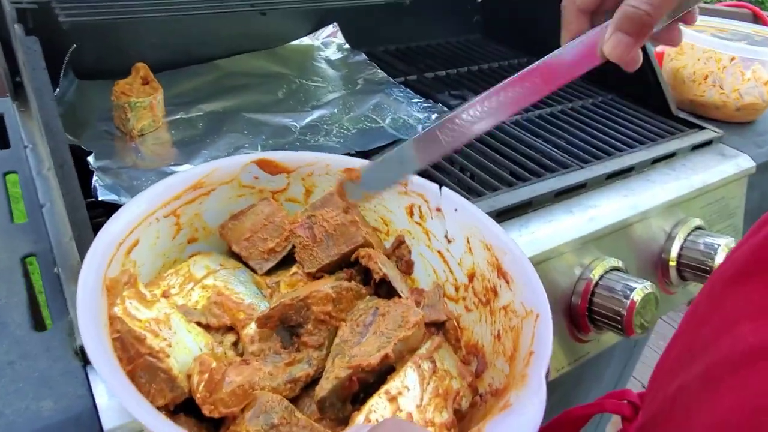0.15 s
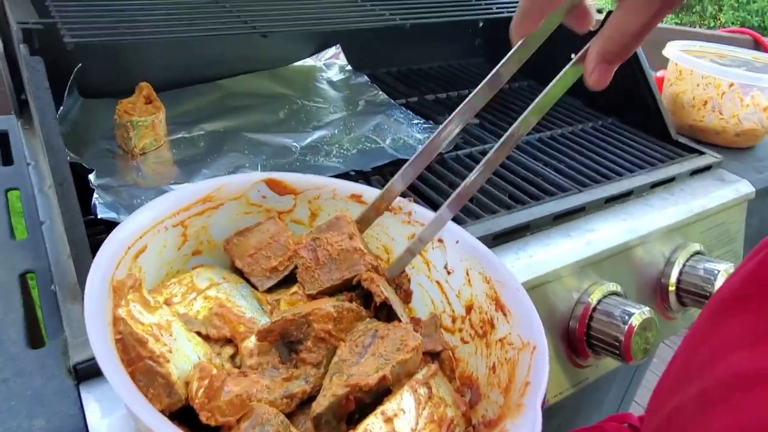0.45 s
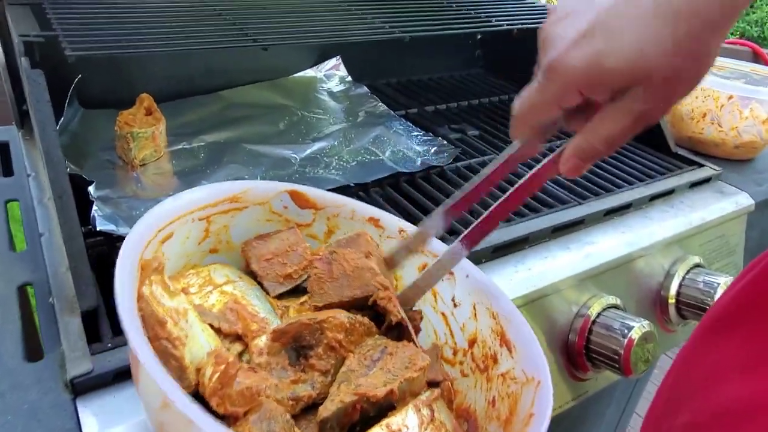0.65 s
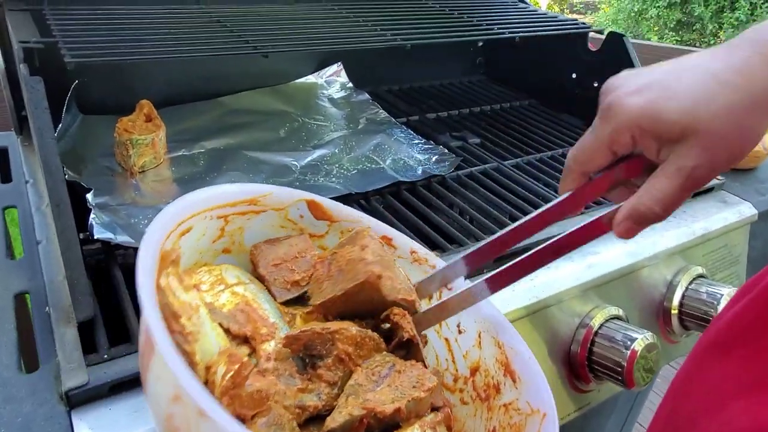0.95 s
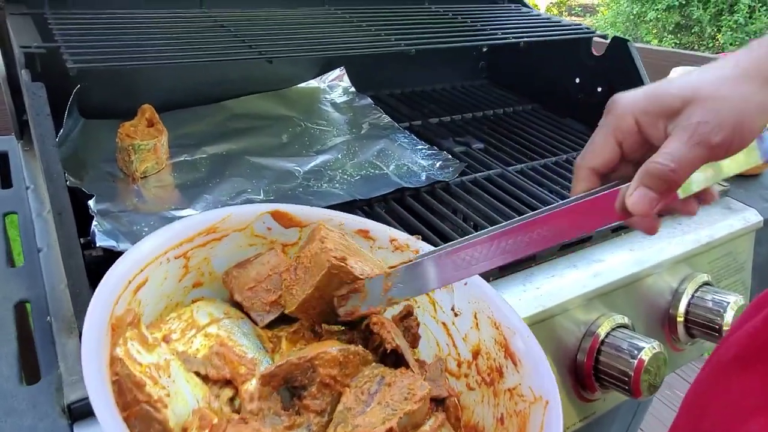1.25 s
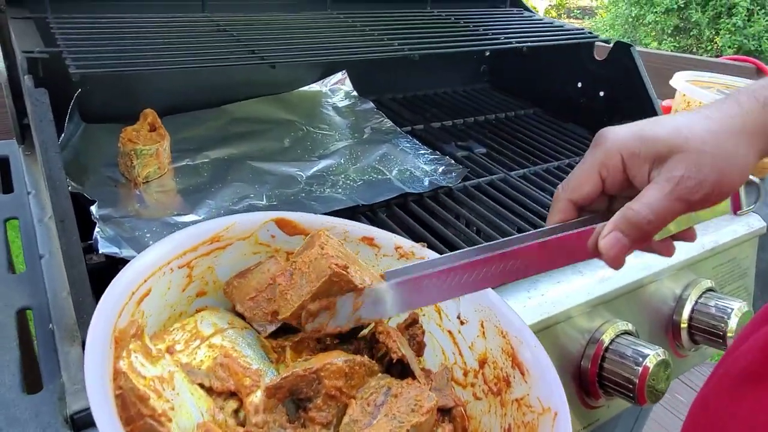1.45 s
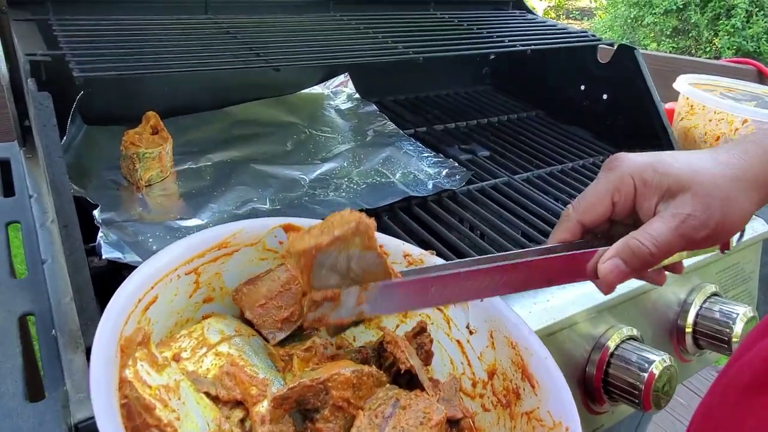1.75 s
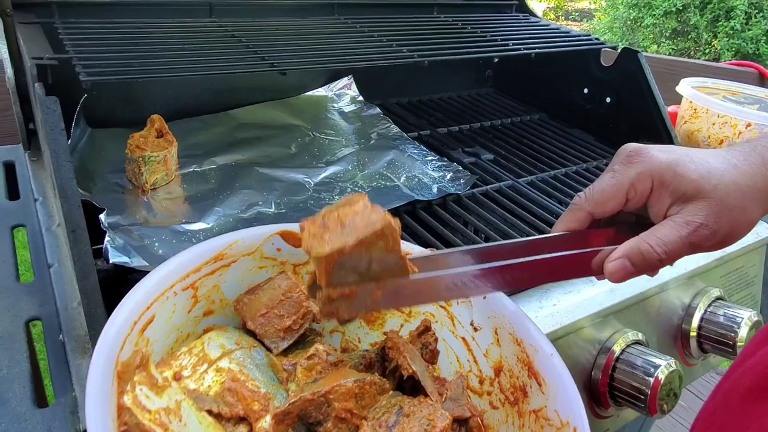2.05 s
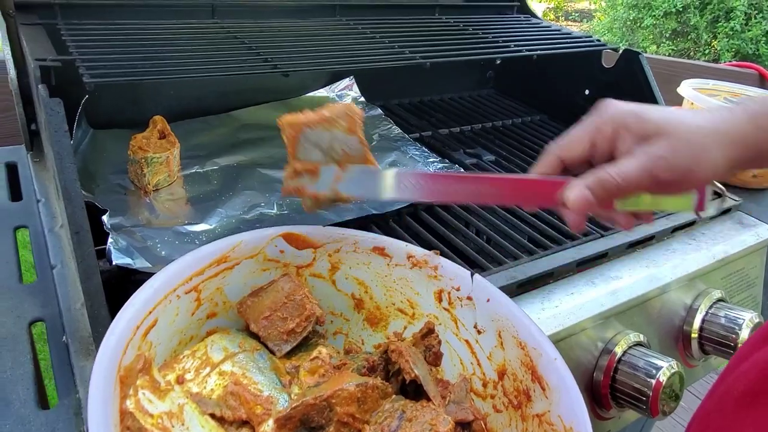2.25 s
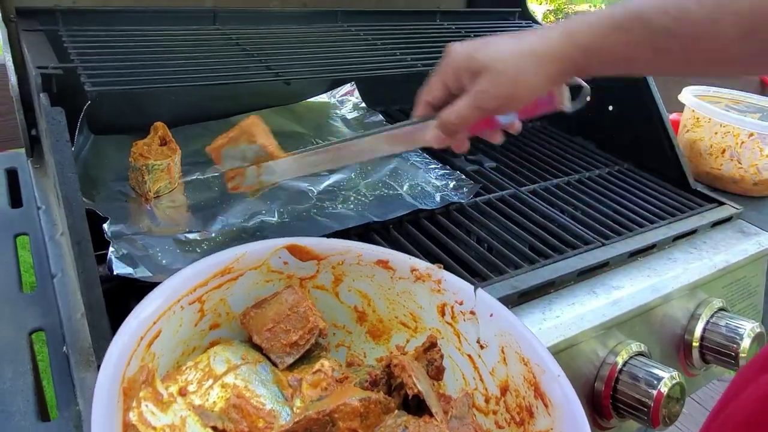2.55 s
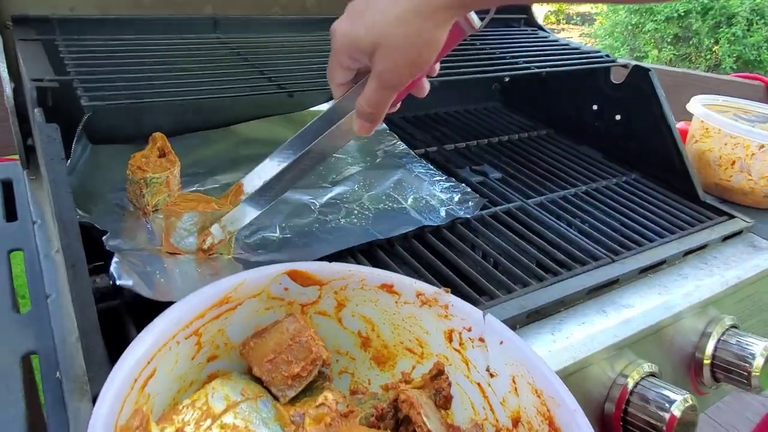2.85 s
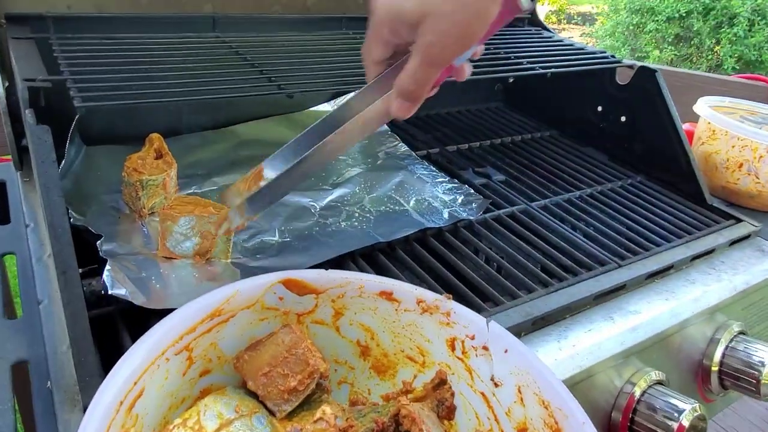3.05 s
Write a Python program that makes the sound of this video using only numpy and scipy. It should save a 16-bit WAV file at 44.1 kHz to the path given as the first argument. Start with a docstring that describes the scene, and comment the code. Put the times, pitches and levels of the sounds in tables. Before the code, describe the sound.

Steel tongs clack hard on a plastic bowl at the very start, followed by smaller, fainter taps; outdoors, close microphone, low rumble and faint grill sizzle beneath, ending with a soft thump and brief hiss on foil.

```python
"""Sharp taps of steel tongs on a plastic bowl of marinated food, held close to the microphone outdoors.
Each tap is a sum of decaying modes with a noise crack; filtered noise gives the tips' rub and the bowl's thud.
Beside it, food on the foil of a lit gas grill sizzles and spits: short noise bursts coloured by the foil.
Late on, a new piece lands with a noise thump and a short hiss that flares twice.
Burner and distant traffic rumble underneath, as noise shaped separately for centre and sides."""
import sys
import numpy as np
from scipy import signal
from scipy.fft import rfft, irfft
from scipy.io import wavfile
from scipy.ndimage import uniform_filter1d

SR = 44100
rng = np.random.default_rng(int(sys.argv[2]) if len(sys.argv) > 2 else 0)


def dump_mix(stems):
    """Bounce the given channels to the path in sys.argv[1] as a 16-bit WAV at rate SR."""
    frames = np.atleast_2d(stems).T  # one column per channel
    limited = np.clip(frames, -1, 1)  # hard clip at full scale
    pcm = np.round(limited * 32767).astype(np.int16)
    wavfile.write(sys.argv[1], SR, pcm)


N = 141120  # samples, 3.2 s

# Touches of the tongs on the bowl: (time [s], ring peak before panning [dB], best excited pitch [Hz],
# reach around it [octaves], left minus right [dB], extra weight of the low body modes [dB],
# pitch factor of the upper modes from the grip [ratio], pitch silenced by touching its node [Hz])
TAPS = [(.0055, -35, 1700, 0.2, 0, 0, 1, 1234), (.012, -39, 2000, 0.41, -4, 12, 1.1, 1300),
        (0.0655, 4, 1430, 1.28, 1.5, -6.5, 1.016, 1730), (0.0814, -29, 1200, 0.2, -5, 0, 0.98, 1512),
        (0.1339, -8, 1460, 0.98, 0, -4.5, 1.04, 1490), (.157, -32, 1500, 1.7, -11, 5, 1, 2300),
        (0.169, -39, 1770, 0.15, 3, 0, 1.1, 1260), (0.1834, -19, 1790, 0.1, 0, -2, 1.03, 1290),
        (0.2947, -24, 1340, 1, -0.5, 14, 1.01, 1580), (0.3165, -31.5, 1610, 0.7, -3, 3, 0.97, 1550),
        (0.4646, -19, 1850, 0.4, -2, 25.5, 1.004, 1530), (0.6715, -29.5, 1750, 0.12, -6, 31, 0.97, 1280),
        (.806, -38, 2020, .3, -2, 5, 0.91, 1234), (0.8162, -17.5, 1800, 0.86, 1.5, 15, .985, 1190),
        (0.8401, -33.5, 2980, 0.92, -6, -8, 0.98, 1300), (1.245, -41, 1750, 0.11, -8, -0.5, 1.3, 1300),
        (1.2531, -29, 1840, 0.089, -4, 40, 1.2, 1300), (1.259, -32, 1900, 0.38, -5, 22, 1.44, 1300),
        (1.333, -30.5, 1350, 1.5, -2, 5, 0.98, 1450), (1.422, -40.5, 1500, 1.6, -11, -2, 0.81, 2000)]
# Modes of bowl and tong tips: (pitch [Hz], relative level [dB], 60 dB decay [s], left minus right [dB])
MODES = [(300.7, -3, 0.067, 0.5), (498, -12, 0.0261, -2.5), (712, -14, 0.036, -9), (1073, -14, 0.046, 1.5),
         (1232, 2.5, 0.023, 0), (1499, -4, 0.021, 5), (1692, -12, 0.028, -3.5), (1955, -7.5, 0.019, -2),
         (2380, -15, 0.016, -1), (2600, -14, 0.025, 2.5), (3130, -3, .014, 3.5), (3290, -3, 0.014, -5),
         (3700, -15, 0.021, -3.5), (3820, -16.5, 0.032, 9.5), (6500, -14.5, 0.022, -13.5),
         (7040, -18, 0.015, 11.5)]
# Tong tips rubbing through the food: (time [s], level before panning [dB])
RUB = [(0, -32), (.02, -43), (.03, -91), (.09, -40), (.125, -76), (.15, -47), (.2, -48), (.23, -86),
       (.36, -64), (.48, -61.5), (.6, -73), (.7, -54), (.77, -64), (.805, -59), (.86, -77.5), (1.2, -64.5),
       (1.38, -63), (1.55, -64), (1.6, -74)]
# Bowl shifting in the hand: (time [s], level before panning [dB])
BOWL_SHIFT = [(0, -65), (.018, -38.5), (.05, -49.5), (.085, -42), (.12, -49.5), (.21, -51), (.26, -58),
              (.33, -51), (.37, -56.5), (.42, -62)]
# Spits of fat on the foil: (time [s], relative level [dB], centre pitch [Hz])
SPITS = [(0.103, -37.5, 12300), (0.198, -40.5, 14400), (0.2453, -45.5, 13000), (0.3292, -44, 14000),
         (0.3685, -41.5, 14200), (0.5761, -40, 8500), (0.601, -44, 13800), (0.6774, -44.5, 14500),
         (1.0733, -38.5, 13000), (1.0992, -48, 14400), (1.1416, -43.5, 13700), (1.286, -45.5, 14000),
         (1.4197, -41, 14200), (1.732, -31.5, 14500), (2.3103, -47.5, 8380), (2.3273, -47, 8960),
         (2.353, -43.5, 12000), (2.451, -38, 11500), (2.5661, -50, 13900), (2.638, -46.5, 13500),
         (2.663, -47.5, 13370), (2.798, -36, 13240)]
# Ring of the foil: (frequency [Hz], gain [dB])
FOIL = [(1000, -41.5), (3000, 0.5), (4500, 5), (5500, 1.5), (8500, 6.5), (10000, 4.5), (11800, 7),
        (12700, 8.5), (13800, 7), (15500, -1.5)]
# Food landing on hot foil: (time [s], relative level [dB], brightness: treble up and bass down [dB])
HISS = [(2.871, -50, 8), (2.874, -41, 7), (2.877, -34, 10), (2.883, -24, 5.5), (2.889, -29, 4),
        (2.894, -28.5, -1.5), (2.900, -24, 0.5), (2.908, -26.5, 3), (2.918, -32, 0.5), (2.925, -33, -1),
        (2.939, -39.5, -2.5), (2.95, -46, -5), (2.975, -66, -8)]
# Colour of that hiss: (frequency [Hz], relative density [dB per Hz])
HISS_COLOUR = [(180, -18), (300, -4.5), (990, -6), (1270, -14), (3490, -3.5), (6670, -8.5), (10500, -4.5),
               (13800, -5), (14800, -11), (15800, -56)]
# Background, centre of the image: (frequency [Hz], relative density [dB per Hz])
AIR_CENTRE = [(15, -61), (25, -33.5), (48, -2), (66, -3), (78, -3.5), (88, 3), (99, -3), (116, 1),
              (140, -10.5), (215, -11.5), (297, -13.5), (359, -12.5), (930, -27), (1170, -32.5),
              (3090, -35), (3530, -32.5), (12200, -31.5), (14300, -27), (15500, -54)]
# Background, sides of the image: (frequency [Hz], relative density [dB per Hz])
AIR_SIDES = [(15, -16), (25, -2), (55, -5.5), (267, -16), (399, -12), (495, -13), (895, -9), (2170, -23.5),
             (13200, -19), (14300, -15), (15500, -40)]
# Steady sizzle, read relative to SIZZLE_REF_DB: (time [s], level [dB])
SIZZLE = [(0.0, -48), (0.22, -59), (0.37, -54.5), (0.52, -59), (1.08, -59.5), (1.27, -57.5), (1.58, -56.5),
          (2.17, -60), (2.8, -56.5), (2.93, -63), (3.2, -58)]

# Taps
ONSET_S, SWELL_S, BODY_BELOW_HZ = .0008, 0.00077, 800
DISPERSION = 0.24  # exponent: higher modes crest earlier
NODE_OCTAVES = .12  # width of the gap that a node leaves
SCATTER_DB, DETUNE = 1.5, .006  # random spread of mode levels, and of pitches as a ratio
RIGHT_LATE_S = .00011
CRACK_DB, CRACK_T60_S, CRACK_HZ = -22.5, 0.026, 6350
YARD_DB, YARD_T60_S = -20, .09
# Rub and bowl thud
RUB_HZ, RUB_OCTAVES, RUB_GRAIN_DB = 1720, .17, 4
THUD_HZ = 215
# Spits and fizz; levels before the foil's ring
SPIT_TRIM_DB, SPIT_T60_S, POP_S, POP_DB = -4.5, .045, 0.003, -3
FIZZ_PER_S, FIZZ_SPREAD_DB, FIZZ_DB = 580, 11, -64
FOIL_PAN_DB = -4.5  # left minus right
# Landing
HISS_GRAIN_DB, CRACKLE_DB = 1.2, 1.4
HISS_LOW_HZ, HISS_HIGH_HZ = 3000, 7500  # edges of the bass and treble bands
HISS_WIDTH, HISS_PAN_DB = 0.96, -2
THUMP_S, THUMP_HZ, THUMP_T60_S = 2.872, 199, 0.26
THUMP_DB = -41.5  # before the decay
# Background; levels before panning and sizzle swells
AIR_CENTRE_DB, AIR_SIDES_DB = -48, -55
SIZZLE_FROM_HZ, SIZZLE_REF_DB = 3000, -57.5
# Microphone side
QUIET_TOP_HZ = 14600  # treble limit of everything but the taps
TOP_HZ, CEILING = 15900, 1.12


def undb(db):
    """Decibels to amplitude ratio."""
    return 10 ** (np.asarray(db, float) / 20)


def level(x, db):
    """Scales to an RMS level in dB."""
    return x * undb(db) / np.sqrt(np.mean(x ** 2))


def curve(table, column=1):
    """One column of a timed table, joined by straight lines."""
    return np.interp(np.arange(N) / SR, *np.array(table).T[[0, column]])


def colour(x, table):
    """Filters to a spectrum of (frequency [Hz], gain [dB]) points."""
    hz, db = np.array(table).T
    f = np.arange(len(x) // 2 + 1) * SR / len(x) + 1
    return irfft(rfft(x) * undb(np.interp(np.log(f), np.log(hz), db)), len(x))


def walk(rate):
    """Random values held 1 / rate seconds, then smoothed; spread near 1."""
    k = int(SR / rate)
    held = np.repeat(rng.standard_normal(N // k + 1), k)
    return np.sqrt(2) * uniform_filter1d(uniform_filter1d(held, k), k)[:N]


def pan(x, db):
    """Sets left against right by db, half on each channel."""
    return x * undb(np.array([[db], [-db]]) / 2)


def add(out, s, x):
    """Mixes x into out from time s."""
    i = int(s * SR)
    out[:, i:i + x.shape[1]] += x[:, :N - i]


def band(x, hz, octaves):
    """Gentle band-pass reaching the given octaves to each side."""
    edges = np.clip([hz / 2 ** octaves, hz * 2 ** octaves], 20, .49 * SR)
    return signal.sosfilt(signal.butter(1, edges, "band", fs=SR, output="sos"), x)


def split(x, hz, kind="low"):
    """Zero-phase low-pass or high-pass."""
    return signal.sosfiltfilt(signal.butter(2, hz, kind, fs=SR, output="sos"), x)


def tong_taps():
    """Each touch rings modes near its pitch, spares one at its node and adds a thin crack of noise."""
    out = np.zeros((2, N))
    # the sound reaches the left channel first
    t = (np.arange(SR // 8) / SR - np.array([[0], [RIGHT_LATE_S]])).clip(0)
    hz, db, t60, side_db = np.array(MODES).T[:, :, None, None]
    is_body = hz < BODY_BELOW_HZ
    rise = np.sin(np.pi / 2 * np.minimum(t / SWELL_S, 1))
    decay = undb(-60 * (t - SWELL_S).clip(0) / t60)
    crest_s = ONSET_S * (hz / 1240) ** -DISPERSION
    for s, peak_db, centre_hz, reach, pan_db, body_db, grip, node_hz in TAPS:
        scatter, detune = rng.standard_normal((2, len(MODES), 1, 1))
        pitch = hz * np.where(is_body, 1, grip)
        gain = undb(db + SCATTER_DB * scatter + body_db * is_body)
        gain = gain / (1 + (np.log2(pitch / centre_hz) / reach) ** 2)
        gain = gain * (1 - np.exp(-(np.log2(pitch / node_hz) / NODE_OCTAVES) ** 2))
        gain = gain * undb(side_db * np.array([[.5], [-.5]]))
        wave = np.cos(2 * np.pi * pitch * (1 + DETUNE * detune) * (t - crest_s))
        ring = (gain * decay * wave).sum(axis=0)
        ring = pan(ring / np.abs(ring * rise).max(), pan_db)
        crack = band(rng.standard_normal(t.shape), CRACK_HZ, 0.88) * undb(CRACK_DB - 60 * t / CRACK_T60_S)
        add(out, s, undb(peak_db) * rise * (ring + crack))
    return out


def yard_reflections(near):
    """Short reflections from bowl, grill lid and walls: the taps convolved with decaying noise."""
    t = np.arange(SR // 4) / SR
    yard = level(rng.standard_normal((2, len(t))) * undb(-60 * t / YARD_T60_S), YARD_DB) / np.sqrt(len(t))
    return signal.fftconvolve(near.mean(axis=0)[None], yard, axes=1)[:, :N]


def tong_rub():
    """Tips rub through the food: grainy noise excites the modes near one pitch."""
    grains = rng.standard_normal((2, N)) * undb(RUB_GRAIN_DB * walk(100))
    ring = np.zeros((2, N))
    for hz, db, _, _ in MODES:
        nearness = 1 / (1 + (np.log2(hz / RUB_HZ) / RUB_OCTAVES) ** 2) ** 2
        ring += undb(db / 2) * band(grains, hz, .06) * nearness
    return pan(level(ring, 0) * undb(curve(RUB)), -1.8)


def bowl_thud():
    """The bowl shifts in the hand: low band noise follows a level curve."""
    thud = level(band(rng.standard_normal(N), THUD_HZ, .45), 0)
    return pan(thud * undb(curve(BOWL_SHIFT)), -1.5)


def fat_spits():
    """Bright spits (a pop, then a short tail) and a fine random fizz, both ringing the foil."""
    t = np.arange(SR // 20) / SR
    shape = undb(SPIT_TRIM_DB - 60 * t / SPIT_T60_S) * (1 + undb(POP_DB) * np.exp(-t / POP_S))
    starts = rng.random(N) < FIZZ_PER_S / SR
    strengths = undb(FIZZ_SPREAD_DB * rng.exponential(size=N).clip(0, 3))
    envelope = signal.fftconvolve(starts * strengths, shape)[:N]
    out = level(envelope * rng.standard_normal((2, N)), FIZZ_DB)
    for s, spit_db, hz in SPITS:
        add(out, s, band(rng.standard_normal((2, len(t))), hz, 1.0) * undb(spit_db) * shape)
    return pan(np.array([colour(x, FOIL) for x in out]), FOIL_PAN_DB)


def landing_hiss():
    """Wet food meets hot foil: wide crackling noise flares twice, dulls and dies."""
    grain = undb(HISS_GRAIN_DB * walk(251.1) + CRACKLE_DB * walk(2000))
    mid, side = (colour(rng.standard_normal(N) * grain, HISS_COLOUR) for _ in range(2))
    hiss = level(mid + HISS_WIDTH * side * np.array([[1], [-1]]), 0)
    low = split(hiss, HISS_LOW_HZ)
    high = split(hiss, HISS_HIGH_HZ, "high")
    bright = undb(curve(HISS, column=2))
    hiss = low / bright + (hiss - low - high) + high * bright
    t = np.arange(N) / SR
    sounding = (t > HISS[0][0]) * (t < HISS[-1][0])
    return pan(hiss * sounding * undb(curve(HISS)), HISS_PAN_DB)


def landing_thump():
    """The piece lands softly: a decaying burst of low band noise."""
    t = np.arange(N) / SR
    thump = level(band(rng.standard_normal(N), THUMP_HZ, 1.0), THUMP_DB)
    return thump * (t > THUMP_S) * undb(-60 * (t - THUMP_S).clip(0) / THUMP_T60_S)


def rumble_and_sizzle():
    """Shaped noise: the rumble below wavers a little, the steady sizzle above swells and fades."""
    mid = level(colour(rng.standard_normal(N), AIR_CENTRE), AIR_CENTRE_DB)
    side = level(colour(rng.standard_normal(N), AIR_SIDES), AIR_SIDES_DB)
    both = pan(mid + side * np.array([[1], [-1]]), -1.2)
    rumble = split(both, SIZZLE_FROM_HZ)
    sizzle = both - rumble
    swell_db = curve(SIZZLE) - SIZZLE_REF_DB + 0.23 * walk(29)
    return rumble * undb(.5 * walk(3.3)) + sizzle * undb(swell_db)


def scene():
    """Close taps and their reflections over the quieter, treble-limited layers."""
    near = tong_taps()
    bowl = tong_rub() + bowl_thud()
    grill = fat_spits() + landing_hiss() + landing_thump()
    quiet = bowl + grill + rumble_and_sizzle()
    treble_limit = signal.ellip(8, .2, 60, QUIET_TOP_HZ, fs=SR, output="sos")
    return near + yard_reflections(near) + signal.sosfilt(treble_limit, quiet)


def record(dry):
    """The microphone chain rounds high peaks smoothly and cuts the top."""
    rounded = CEILING * np.tanh(dry / CEILING)
    return signal.sosfilt(signal.ellip(10, .2, 80, TOP_HZ, fs=SR, output="sos"), rounded)


dry = scene()
out = record(dry)
dump_mix(out)
```